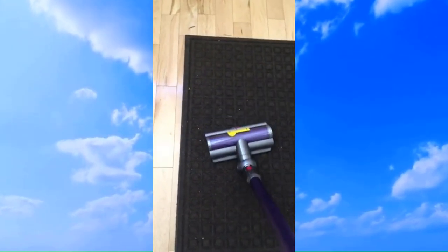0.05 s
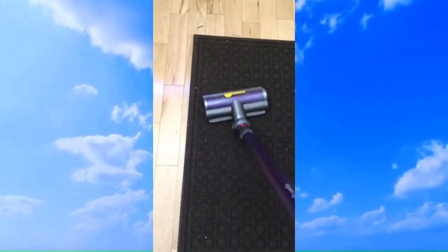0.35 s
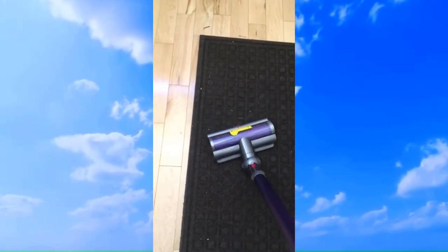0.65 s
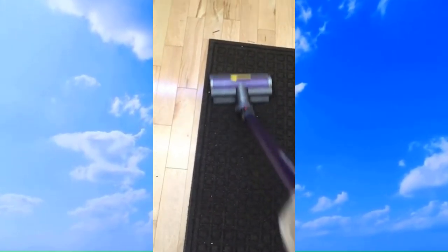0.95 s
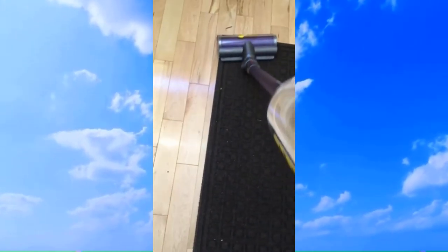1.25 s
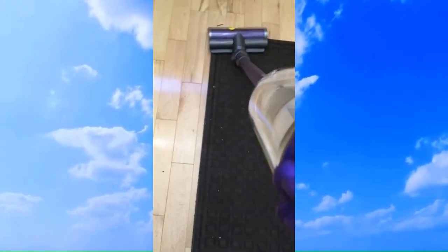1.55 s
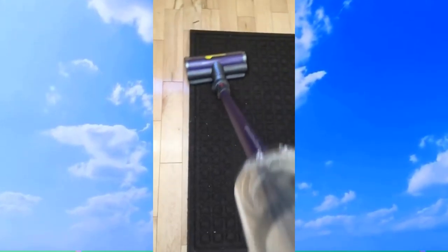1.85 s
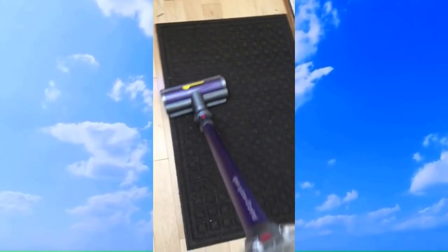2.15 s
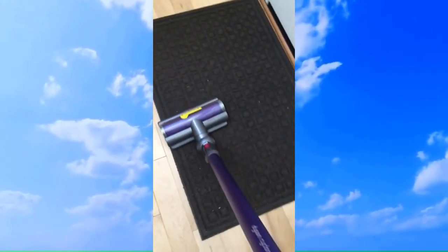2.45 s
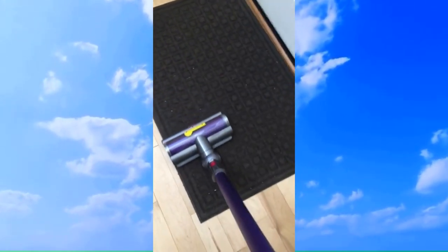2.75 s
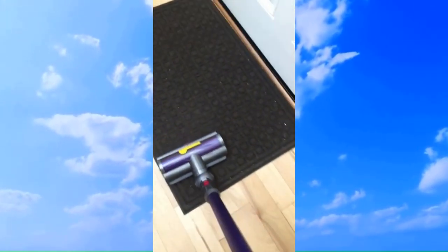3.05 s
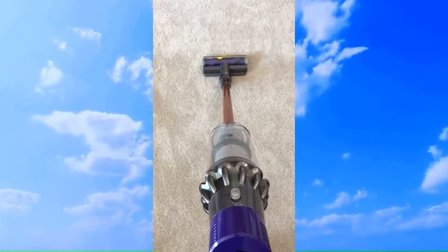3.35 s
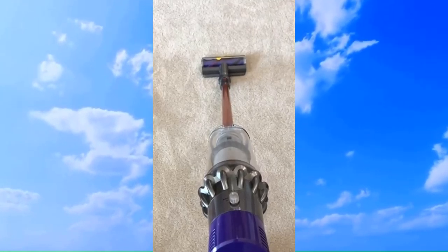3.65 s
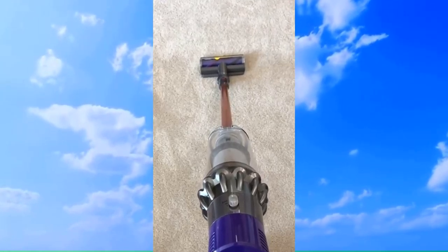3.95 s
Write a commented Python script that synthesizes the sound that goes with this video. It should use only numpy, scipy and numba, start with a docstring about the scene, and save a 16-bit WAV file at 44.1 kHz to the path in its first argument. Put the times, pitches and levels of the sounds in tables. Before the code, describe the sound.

Heard from near the handle indoors, a cordless vacuum is pushed over a door mat with a hollow roar, a rush of air and a high motor whine that drops slightly. It stops abruptly for about a second. Small plastic clicks follow and the motor quickly spins up again, now on carpet, where the whine wavers above steady hiss, muffled scrubbing and a few soft bumps of the head.

```python
"""A cordless stick vacuum cleaner runs over a rubber-backed door mat, then, after a cut, starts on carpet.
Its fan whines at its spin rate and at multiples of it, and drives a hissing stream of air.
The floor head roars and its brush roller hums. Walls return the whine by shifting paths, so each
tone flutters as the machine is pushed along. The trigger clicks and the head bumps in a quiet room."""
import sys
import numpy as np
from scipy import signal
from scipy.fft import rfft, irfft, next_fast_len
from scipy.io import wavfile
from scipy.ndimage import uniform_filter1d, map_coordinates
from numba import njit

SR = 44100
rng = np.random.default_rng(int(sys.argv[2]) if len(sys.argv) > 2 else 0)


def generate_wav(sig):
    """Save sig (samples, or channels by samples) to the path in sys.argv[1] as 16-bit PCM at SR."""
    pcm = np.round(np.clip(np.atleast_2d(sig).T, -1, 1) * 32767).astype(np.int16)
    wavfile.write(sys.argv[1], SR, pcm)


N = 419391
TIME = np.arange(N) / SR
MAT_END_S, CARPET_START_S, SWITCH_ON_S = 3.245, 3.327, 4.138
CRUISE_HZ, RUN_UP_HZ_PER_S, SETTLE_LAG_S = 1690, 16700, .076  # the fan's start on the carpet


def undb(db):
    """Turn decibels into a gain."""
    return 10 ** (np.asarray(db) / 20)

def unit(x):
    """Scale a sound to an average (rms) level of 1."""
    return x / np.sqrt(np.mean(x ** 2))

def curves(table):
    """Join a table's rows by straight lines in time: one curve for each column after the first."""
    seconds, *columns = np.transpose(table)
    return [np.interp(TIME, seconds, column) for column in columns]

def ramp(start_s, length_s):
    """A straight rise from 0 to 1."""
    return np.clip((TIME - start_s) / length_s, 0, 1)

def lag(start_s, lag_s):
    """1 until the start, then dying away."""
    return np.exp(-np.maximum(TIME - start_s, 0) / lag_s)

def bell(x, centre, width):
    """A smooth hump, 1 at its centre."""
    return np.exp(-((x - centre) / width) ** 2)

def swing(db):
    """How far a level is above its usual value after switching on."""
    return db - np.median(db[TIME > SWITCH_ON_S])

def walk(rate):
    """A smooth random wander of about 1 either way, with `rate` new values a second."""
    knots, steps = rng.standard_normal(2048), np.arange(0, N, 32)
    coarse = map_coordinates(knots, [steps / SR * rate], order=3, mode="wrap")
    return np.interp(np.arange(N), steps, coarse)

def rush(colour, low_hz=10., high_hz=20000.):
    """The noise of swirling air, shaped by a colour table and fading outside the given pitches."""
    size = next_fast_len(N)
    f = np.maximum(np.fft.rfftfreq(size, 1 / SR), 1)
    hz, db = np.transpose(colour)
    gain = undb(np.interp(np.log(f), np.log(hz), db))
    low, high = max(low_hz, hz[0] * .8), min(high_hz, hz[-1] * 1.3)
    gain /= np.sqrt((1 + (low / f) ** 12) * (1 + (f / high) ** 12))
    return unit(irfft(rfft(rng.standard_normal(size)) * gain, size)[:N])

@njit
def resonance(x, hz, width):
    """A filter that lets through what lies near one pitch, which may move."""
    y, band_state, low_state = np.empty(len(x)), 0., 0.
    for i in range(len(x)):
        tuning, damping = np.tan(np.pi * hz[i] / SR), width / hz[i]
        passed = (band_state + tuning * (x[i] - low_state)) / (1 + tuning * (tuning + damping))
        band_state, low_state = 2 * passed - band_state, low_state + 2 * tuning * passed
        y[i] = damping * passed
    return y

def ring(x, hz, width):
    """Pass a sound twice through a resonance, for steeper sides."""
    centre = hz + np.zeros(len(x))
    return resonance(resonance(x, centre, 1.6 * width), centre, 1.6 * width)

def band(hz, width):
    """Swirling air rings a resonance; pitch and width are in Hz."""
    return unit(ring(rng.standard_normal(N), hz, width))

def tone(hz, scatter, flutter_rate, rough=.11):
    """A tone plus its drifting echoes off the walls, roughened by the air flow."""
    echoes = scatter * (walk(flutter_rate) + 1j * walk(flutter_rate))
    roughness = rough * (walk(130) + 1j * walk(130))
    return unit(np.real((1 + echoes + roughness) * np.exp(2j * np.pi * np.cumsum(hz) / SR)))


# The colour of the room's noise. Each row: pitch in Hz, relative level in dB.
ROOM_COLOUR = [(18, -52), (30, -19), (76, 0), (137, 0), (577, -13), (1100, -14), (2770, -27), (4400, -20),
               (4880, -29), (10000, -34), (14000, -39)]

def room():
    """The faint, low noise of a quiet room."""
    return undb(-71.5) * rush(ROOM_COLOUR)


# Trigger and switch clicks. Each row: start in seconds, peak level in dB, pitch in Hz.
TRIGGER_CLICKS = [(3.992, -55.5, 1010), (4.043, -54, 6000), (4.049, -48, 2100), (4.062, -48, 2800),
                  (4.08, -43, 1500), (4.137, -45, 2500), (4.146, -31.5, 1300)]
# Soft knocks on the floor. Each row: start in seconds, peak level in dB.
HEAD_BUMPS = [(1.11, -42.5), (4.17, -52), (4.245, -54), (7.66, -52), (7.75, -44)]

def knocks(click_decay_s=.046, bump_decay_s=.16, bump_hz=62.):
    """Small hits ring briefly: the plastic trigger clicks and the head bumps dully."""
    out, t = np.zeros(N), np.arange(SR // 4) / SR
    clicks = [(s, db, hz, hz * 1.06, click_decay_s) for s, db, hz in TRIGGER_CLICKS]
    bumps = [(s, db, bump_hz, 50., bump_decay_s) for s, db in HEAD_BUMPS]
    for start_s, db, hz, width, decay_s in clicks + bumps:
        burst = rng.standard_normal(len(t)) * undb(-60 * t / decay_s)
        hit, at = ring(burst, hz, width), int(start_s * SR)
        out[at:at + len(t)] += undb(db) * hit / np.abs(hit).max()
    return out


# The roller's higher tones. Each row: multiple of its spin rate, level in dB.
BRUSH_OVERTONES = [(3, -55), (4, -54), (5, -61.5), (6, -56.5)]

def brush_roller(hz, once_db, twice_db):
    """The roller hums once a turn from being off balance and twice a turn from its bristle rows."""
    contact = np.minimum(hz / 54, 1) ** 4
    wobble = undb(once_db) * tone(hz, .2, 7)
    bristles = undb(twice_db) * tone(2 * hz, .22, 12)
    overtones = sum(undb(db) * tone(k * hz, .55, 9) for k, db in BRUSH_OVERTONES)
    return bristles + contact * (wobble + overtones)


# The roller's hum. Each row: time in seconds, once-a-turn and twice-a-turn relative levels in dB.
MAT_HUM = [(0.0, -69, -72), (0.07, -55.5, -56), (1.08, -52.5, -64), (1.14, -46, -55), (1.48, -56.5, -46.5),
           (2.43, -69.5, -51.5), (2.73, -60.5, -71), (2.91, -64, -56), (3.16, -61, -72), (3.22, -59.5, -60)]
# The roar as the head is pushed along. Each row: time in seconds, relative level in dB.
MAT_ROAR_LEVEL = [(0.0, -32.5), (1.79, -28), (1.82, -30.5), (2.54, -29), (3.22, -31.5)]
# The roar's colour. Each row: pitch in Hz, relative level in dB.
MAT_ROAR_COLOUR = [(25, -28), (50, -19.5), (100, -16), (145, -14), (190, -5.5), (320, -2), (470, -1),
                   (650, -2), (730, -4), (880, -2), (1400, -4.5), (2000, -19.5)]
# The air pocket under the sliding head. Each row: time in seconds, lower and upper pitch in Hz.
AIR_POCKET = [(0, 448, 608), (.75, 428, 622), (1.2, 487, 601), (1.65, 544, 666), (2.0, 507, 588),
              (2.4, 410, 604), (2.65, 350, 581), (2.98, 320, 490), (3.24, 349, 526)]

def head_on_mat(edge, brush_hz=64.):
    """The head roars on the ribbed mat, ringing the air under it, while its roller hums."""
    (roar_db,), (lower_hz, upper_hz) = curves(MAT_ROAR_LEVEL), curves(AIR_POCKET)
    once_db, twice_db = curves(MAT_HUM)
    pocket = undb(-5) * (band(lower_hz, 75.) + band(upper_hz, 34.))
    tube = undb(-9) * band(635., 26.)  # the tube's own note stays put
    roar = undb(-2.5) * rush(MAT_ROAR_COLOUR) + pocket + tube
    slap = 1 + .063 * np.sin(2 * np.pi * 2 * brush_hz * TIME)  # bristles hit the ribs twice a turn
    roar *= undb(roar_db - .3 * edge + walk(22)) * slap
    growl = undb(-41) * bell(TIME, .89, .088) * band(187, 50.)
    return roar + growl + brush_roller(np.full(N, brush_hz), once_db - .5, twice_db)


# The roller runs up slowly and speeds up when drawn back.
# Each row: time in seconds, turns per second, twice-a-turn level in dB.
CARPET_HUM = [(4.3, 30, -85), (4.9, 55.16, -63.5), (6.5, 54.36, -59.5), (7.3, 54.34, -51),
              (7.55, 59.26, -52), (8.15, 59.2, -62), (8.55, 55.2, -71), (8.95, 54.4, -58), (9.5, 55, -58.5)]
# Air rushing through the gap under the head. Each row: time in seconds, relative level in dB.
GAP_LEVEL = [(4.35, -39), (4.38, -38.5), (5.04, -40.5), (5.34, -36), (7.89, -36), (8.05, -42),
             (9.21, -41.5), (9.31, -37), (9.5, -37)]
# The colours of that rush and of the scrubbing. Each row: pitch in Hz, relative level in dB.
GAP_COLOUR = [(500, -22), (760, -5.5), (1000, -2), (1350, 0.5), (1600, -2), (1950, -7), (2350, -7.5),
              (2900, -29), (5000, -43)]
SCRUB_COLOUR = [(25, -26), (50, -21), (95, -15.5), (165, -2.5), (250, -2.5), (335, 3), (420, -1.5),
                (520, -2.5), (700, -3.5), (1500, -25.5)]

def head_on_carpet(flow):
    """Air rushes under the head, muffled by the pile; the bristles scrub harder as the gap closes."""
    (gap_db,), (brush_hz, twice_db) = curves(GAP_LEVEL), curves(CARPET_HUM)
    gap = undb(gap_db + 1 + .19 * walk(12)) * rush(GAP_COLOUR)
    scrub = undb(-44 - .32 * swing(gap_db) + 1.1 * walk(18)) * rush(SCRUB_COLOUR)
    hum = brush_roller(brush_hz, once_db=-67, twice_db=twice_db)
    return flow ** .95 * gap + flow ** .84 * (scrub + hum)


# Echoes off the hand and a wall. Each row: delay in seconds, share by which it drifts, gain in dB.
NEAR_ECHOES = [(.0004, .2, -23.5), (.0045, .04, -13)]

def reflected(x):
    """Nearby echoes give a hollow colour that shifts as the machine moves."""
    out = x.copy()
    for delay_s, drift, db in NEAR_ECHOES:
        earlier = np.arange(N) - delay_s * SR * (1 + drift * walk(1.1))
        out += undb(db) * map_coordinates(x, [earlier], order=3, mode="mirror")
    return out


# The air stream's colour on the mat. Each row: pitch in Hz, relative level in dB.
MAT_AIR_COLOUR = [(1000, -7), (1550, -1), (2500, -0.4), (3400, -6.5), (3950, -4.5), (4900, -8.5),
                  (5900, -3.5), (6600, -6.5), (7600, -11), (8600, -9), (9700, -7), (10400, -11),
                  (11300, -6.5), (15000, -6)]
# Air whistling in past the mat's edge. Each row: pitch in Hz, width in Hz, relative level in dB.
LEAK_WHISTLES = [(3000, 370, -4), (3860, 770, -3), (6100, 1000, 0.5), (8370, 830, -8)]

def air_on_mat(boost, edge):
    """The air stream hisses; where the head overhangs the mat, air leaks in and the hiss swells."""
    hiss = undb(-32 + 1.53 * boost + 3.5 * edge + .62 * walk(14)) * rush(MAT_AIR_COLOUR, high_hz=7670)
    sizzle = undb(-34.5 + 8.5 * edge + .29 * walk(24)) * rush(MAT_AIR_COLOUR, low_hz=7700)
    leak = sum(undb(db) * band(hz, width) for hz, width, db in LEAK_WHISTLES)
    return reflected(hiss + sizzle + undb(-46 + 18.5 * edge) * leak)


# The exhaust turns to and from the listener.
# Each row: time in seconds, relative levels of the hiss and of the high sizzle in dB.
EXHAUST_LEVELS = [(4.3, -31.5, -33), (4.47, -31, -33), (4.95, -30.5, -33.5), (5.07, -30.5, -34),
                  (6.73, -30, -31), (7.17, -31, -29), (7.51, -31.5, -33), (8.06, -31, -34),
                  (8.41, -39, -41), (8.99, -36, -38), (9.19, -32, -33.5), (9.5, -31.5, -34.5)]
# The air stream's colour on the carpet. Each row: pitch in Hz, relative level in dB.
CARPET_AIR_COLOUR = [(1500, -3.5), (1950, -2), (2350, -1), (2850, -2), (4100, 0.5), (4650, -1.5),
                     (5600, 1.5), (6300, -1.5), (6850, -3.5), (7600, -9), (10000, -1.5), (12800, -4.5),
                     (14000, 3), (15000, -7)]
# The ringing of the bin and motor housing. Each row: pitch in Hz, width in Hz, level in dB.
HOUSING_RINGS = [(2317, 390, -40), (3060, 890, -46), (5660, 600, -56.5), (6900, 480, -44.5),
                 (8300, 1500, -44.5)]

def air_on_carpet(flow):
    """The exhaust hisses, and the housing's ringing drifts as the machine turns in the hand."""
    hiss_db, sizzle_db = curves(EXHAUST_LEVELS)
    hiss = undb(hiss_db - 2.5 + .52 * walk(12)) * rush(CARPET_AIR_COLOUR, low_hz=3200, high_hz=7600)
    sizzle = undb(sizzle_db + .2 + .31 * walk(12)) * rush(CARPET_AIR_COLOUR, low_hz=7760)
    housing = sum(undb(db + .79 * walk(2.49)) * band(hz * (1 + .004 * walk(1.65)), width)
                  for hz, width, db in HOUSING_RINGS)
    housing *= undb(.29 * swing(hiss_db))  # it beams less than the exhaust jet
    return reflected(flow ** 1.25 * (hiss + housing) + flow ** 1.7 * sizzle)


# The whine swells and fades as it moves through the room's loud and quiet spots (standing waves),
# first at boosted speed, then eased down. Each row: time in seconds, relative level in dB.
FAST_WHINE_LEVEL = [(0.0, -39), (0.104, -52.5), (0.33, -37), (0.61, -46), (0.928, -39), (1.012, -47),
                    (1.22, -27.5), (1.392, -35.5), (1.7, -36.5)]
SLOW_WHINE_LEVEL = [(1.97, -38), (2.07, -37), (2.112, -29.5), (2.718, -37.5), (2.736, -46.5), (2.906, -33),
                    (2.976, -50), (3.03, -33), (3.22, -31.5)]
# The whine's higher tones. Each row: multiple of the fan's spin rate, relative level in dB.
MAT_OVERTONES = [(2, -15.5), (3, -20.5), (5, -27), (7, -27.5), (8, -23.5)]

def fan_on_mat(boost, eased_hz=1684, boost_hz=1869):
    """The fan whines at its spin rate, with harder overtones while it runs faster."""
    (whine_db,) = curves(FAST_WHINE_LEVEL + SLOW_WHINE_LEVEL)
    hz = eased_hz + (boost_hz - eased_hz) * boost
    housing_gain = 1 + undb(6) * bell(hz, 1806, 40)  # the slowing tone rings the housing in passing
    whine = housing_gain * tone(hz, .22, 16, rough=.14)
    overtones = undb(7 * (boost - .5)) * sum(undb(db) * tone(k * hz, .34, 15) for k, db in MAT_OVERTONES)
    shrill = undb(-35.5 + 1.5 * walk(24)) * tone(9 * hz, .65, 28)
    whistle = (1 - boost) * undb(-45.5) * tone(np.full(N, 2713.), .9, 30)  # only at the lower speed
    return undb(whine_db + 2.5) * (whine + overtones) + shrill + whistle


def shrill_on_carpet(hz):
    """A shrill tone at nine times the fan's spin rate, whose level follows the exhaust jet."""
    jet_db = swing(curves(EXHAUST_LEVELS)[1])
    strain = lag(SWITCH_ON_S + CRUISE_HZ / RUN_UP_HZ_PER_S, SETTLE_LAG_S)  # the motor's starting pull
    unsettled = 1 - ramp(4.53, .05)  # the tone stays weak until the speed has settled
    level_db = -26 + 1.5 * jet_db - 13 * unsettled + 5 * strain + 1.5 * walk(24)
    zip_gain = 1 + undb(3) * bell(9 * hz, 3950, 650)  # it rings the housing on its way up
    scatter = .3 * undb(-.8 * jet_db)  # echoes take over when the jet points away
    return zip_gain * undb(level_db) * tone(9 * hz, scatter, 32)


# The whine in the room's loud and quiet spots. Each row: time in seconds, relative level in dB.
CARPET_WHINE_LEVEL = [(4.3, -25.5), (4.39, -23), (5.12, -21.5), (5.78, -27.5), (5.95, -24.5), (6.94, -25.5),
                      (7.31, -31), (7.67, -22.5), (7.98, -28.5), (8.09, -23.5), (8.3, -32.5), (8.43, -26.5),
                      (8.54, -27.5), (8.65, -35.5), (9.15, -24), (9.31, -29), (9.41, -23.5), (9.5, -25.5)]
# The whine's higher tones. Each row: multiple of the fan's spin rate, relative level in dB.
CARPET_MULTIPLES = [(2, -2), (3, 2.5), (4, -24), (5, -27), (6, -15), (7, -11), (8, -10)]
# How those tones swell and fade.
# Each row: time in seconds, relative level in dB of multiples 3 and up, the same for multiple 2.
MULTIPLE_LEVELS = [(4.35, -34, -42), (5.68, -39, -45.5), (5.86, -40.5, -53), (6.52, -38, -41.5),
                   (6.72, -41, -46.5), (6.97, -42, -42), (7.1, -46, -60), (7.39, -49, -52),
                   (7.68, -44, -54), (7.92, -35.5, -43), (8.39, -50.5, -47), (9.36, -39.5, -48.5),
                   (9.5, -41, -47)]

def fan_on_carpet(hz, flow):
    """The fan's whine grows with its speed; most overtones come in only near full speed."""
    (whine_db,), (higher_db, second_db) = curves(CARPET_WHINE_LEVEL), curves(MULTIPLE_LEVELS)
    whine = undb(whine_db + 1.13) * tone(hz, .031, 16, rough=.04)
    overtones = sum(undb(db + (second_db + 5.5 if k == 2 else higher_db + 1)) * tone(k * hz, .13, 11)
                    for k, db in CARPET_MULTIPLES)
    return flow ** 2.55 * whine + flow ** 14 * overtones + flow ** .75 * shrill_on_carpet(hz)


def vacuum_on_mat():
    """The vacuum runs boosted, then eases down; its head overhangs the mat's edge once."""
    boost = lag(start_s=1.75, lag_s=.063)
    edge = ramp(start_s=1.022, length_s=.33) - ramp(start_s=1.692, length_s=.43)
    return head_on_mat(edge) + air_on_mat(boost, edge) + fan_on_mat(boost)


# The speed at which the carpet's load holds the fan. Each row: time in seconds, turns per second.
LOADED_SPEED = [(4.6, 1693), (5.62, 1700), (7.29, 1700), (7.56, 1693), (8.41, 1692), (8.69, 1703),
                (9.5, 1703)]

def vacuum_on_carpet(wander_hz=.65, settle_hz=550):
    """The motor spins up in about a tenth of a second, then settles; whine and air follow its speed."""
    (load_hz,) = curves(LOADED_SPEED)
    settling_hz = load_hz + wander_hz * walk(4) - settle_hz * lag(SWITCH_ON_S, SETTLE_LAG_S)
    hz = np.clip(RUN_UP_HZ_PER_S * (TIME - SWITCH_ON_S), 0, settling_hz)
    flow = np.minimum(hz / CRUISE_HZ, 1)
    return head_on_carpet(flow) + air_on_carpet(flow) + fan_on_carpet(hz, flow)


def scene():
    """The mat, a moment of silence, then the carpet, the same in both channels."""
    mat_fade = undb(-60 * np.clip((TIME - MAT_END_S) / .03, 0, 3))
    carpet_fade = uniform_filter1d(1. * (TIME > CARPET_START_S), size=128)
    mono = mat_fade * vacuum_on_mat() + carpet_fade * (room() + vacuum_on_carpet()) + knocks()
    return np.array([mono, mono])

def record(dry, bass_hz=36, top_hz=15500):
    """The microphone thins the deepest bass, and the highest treble is cut steeply."""
    thinned = signal.sosfilt(signal.butter(2, bass_hz, "highpass", fs=SR, output="sos"), dry)
    return signal.sosfilt(signal.ellip(14, .1, 90, top_hz, fs=SR, output="sos"), thinned)


dry = scene()
out = record(dry)
generate_wav(out)
```